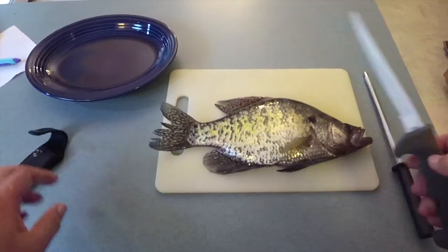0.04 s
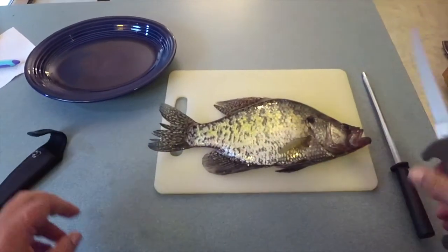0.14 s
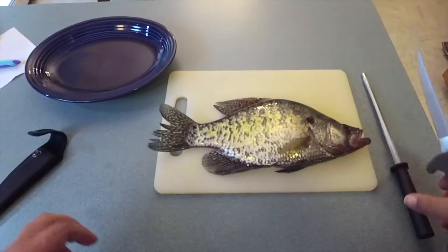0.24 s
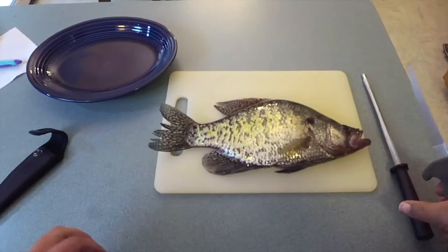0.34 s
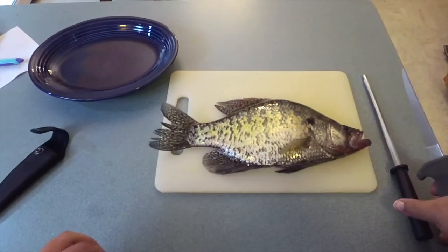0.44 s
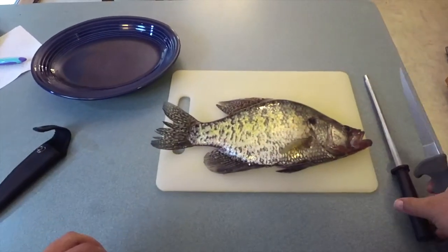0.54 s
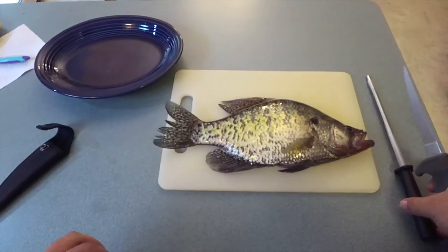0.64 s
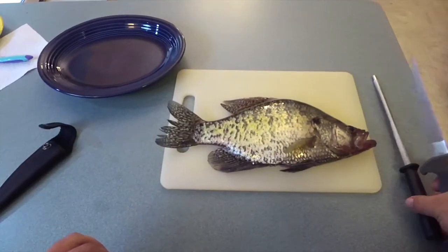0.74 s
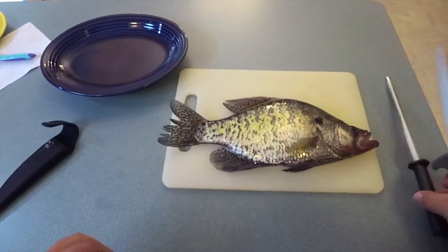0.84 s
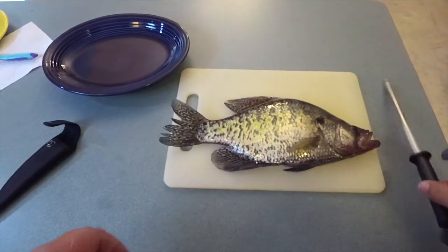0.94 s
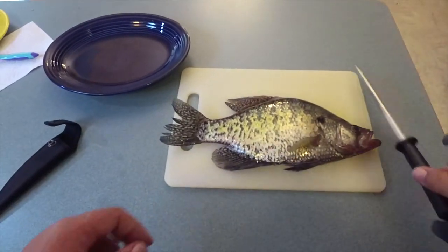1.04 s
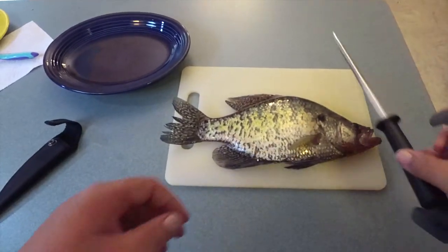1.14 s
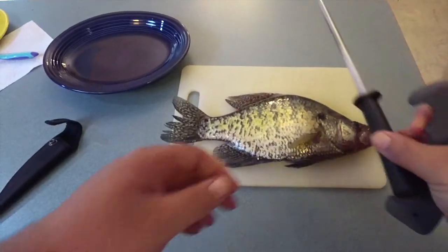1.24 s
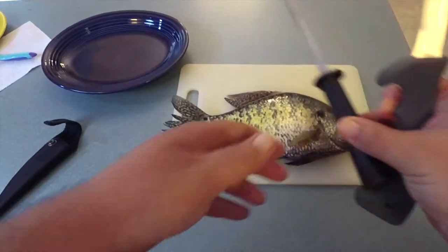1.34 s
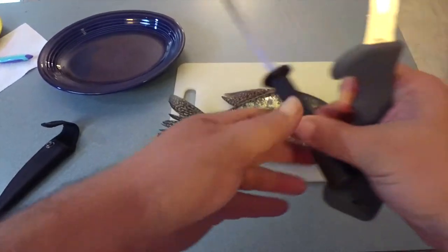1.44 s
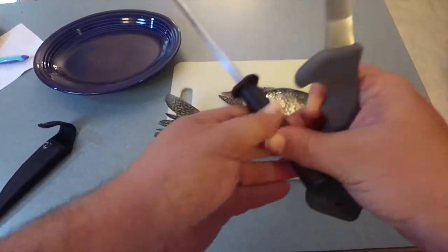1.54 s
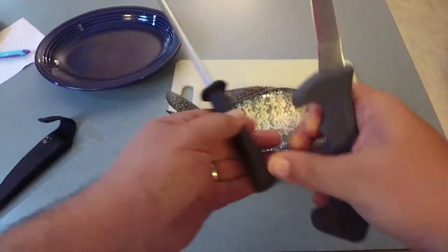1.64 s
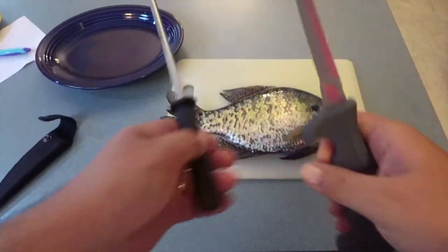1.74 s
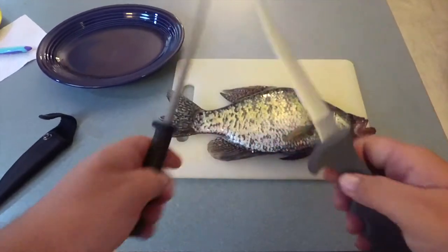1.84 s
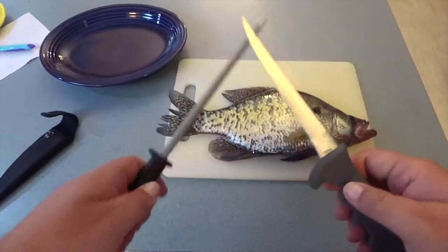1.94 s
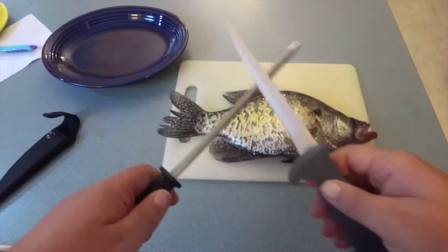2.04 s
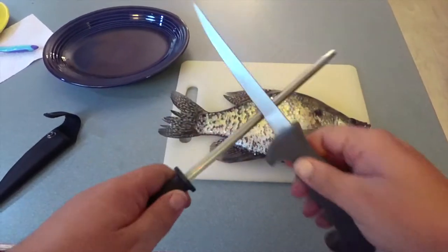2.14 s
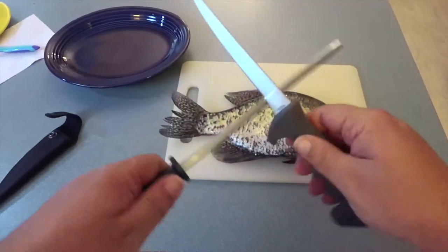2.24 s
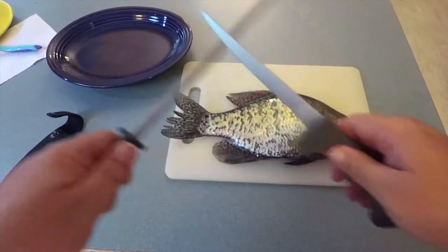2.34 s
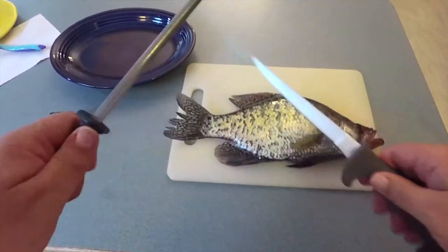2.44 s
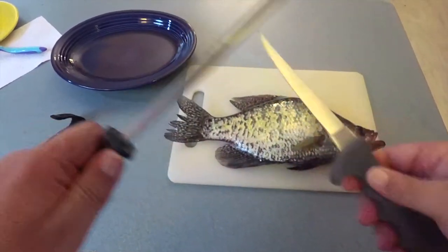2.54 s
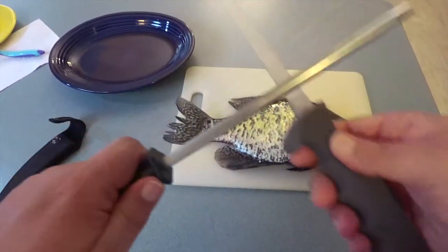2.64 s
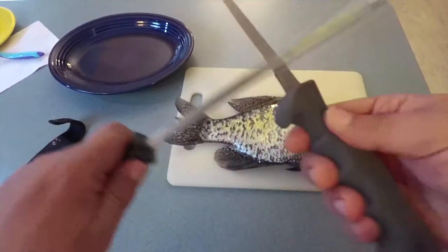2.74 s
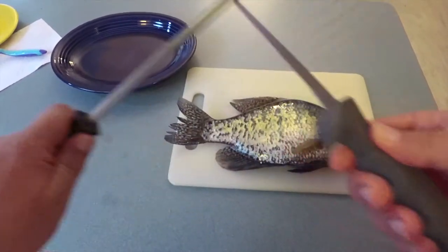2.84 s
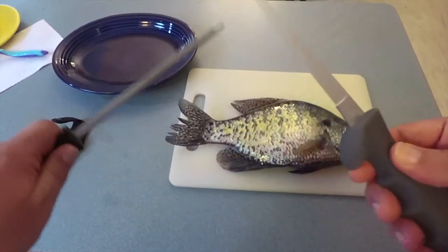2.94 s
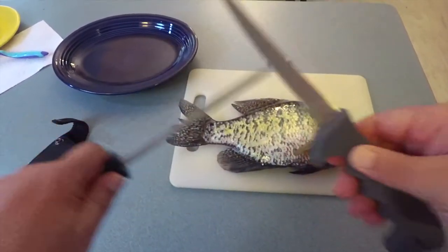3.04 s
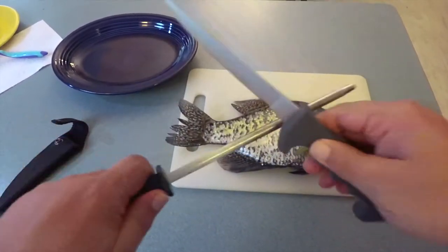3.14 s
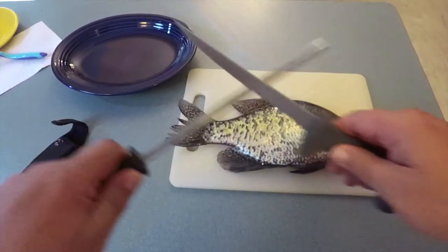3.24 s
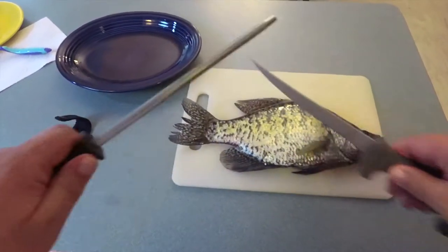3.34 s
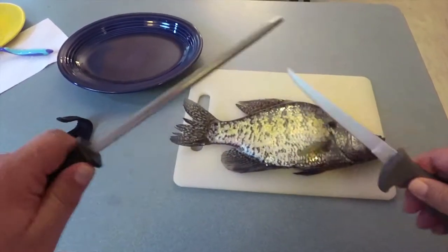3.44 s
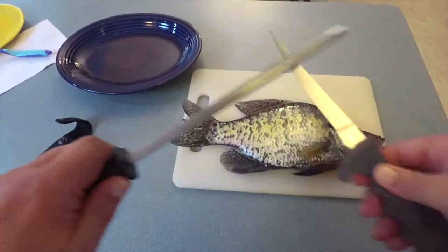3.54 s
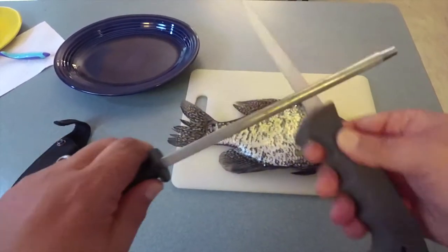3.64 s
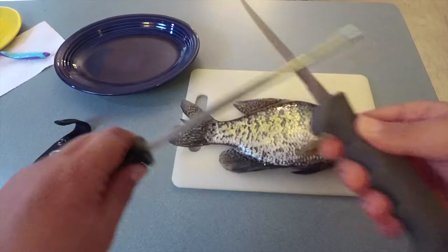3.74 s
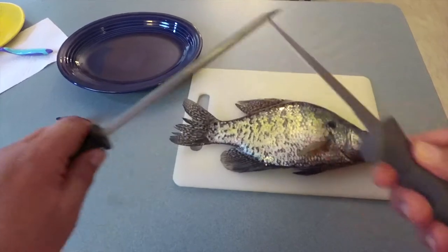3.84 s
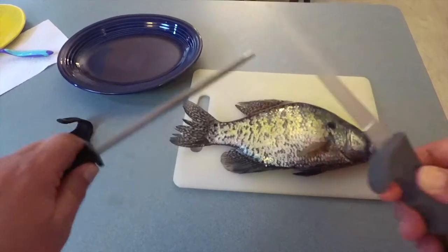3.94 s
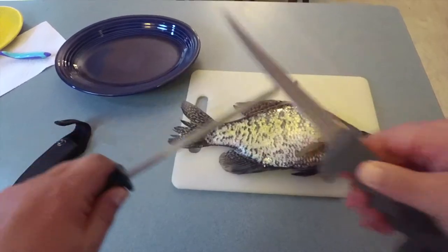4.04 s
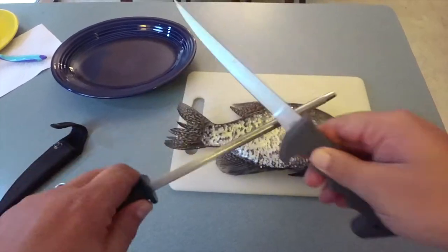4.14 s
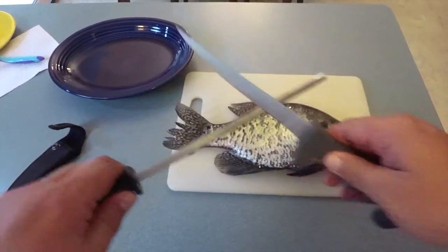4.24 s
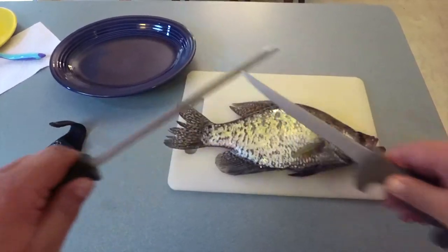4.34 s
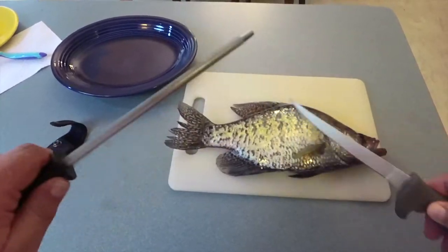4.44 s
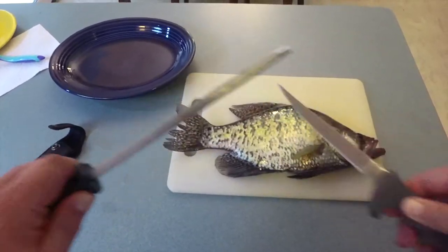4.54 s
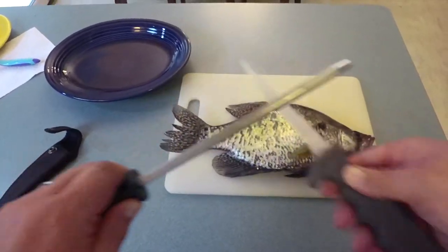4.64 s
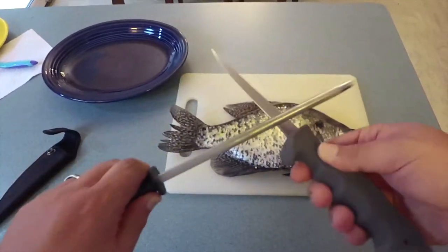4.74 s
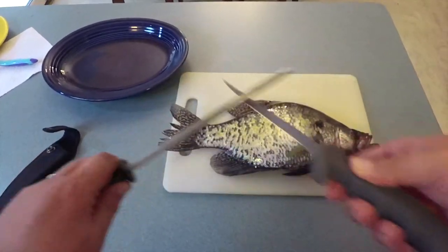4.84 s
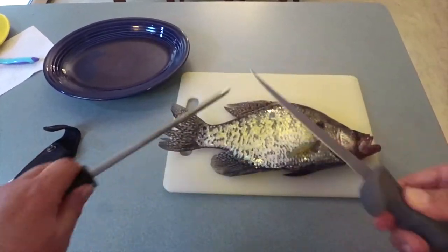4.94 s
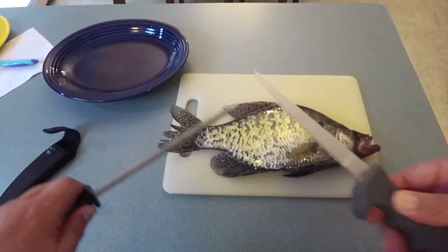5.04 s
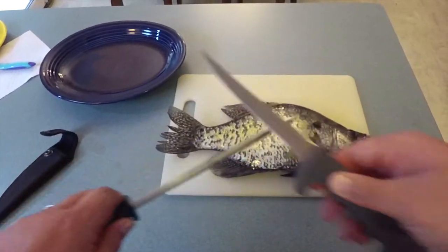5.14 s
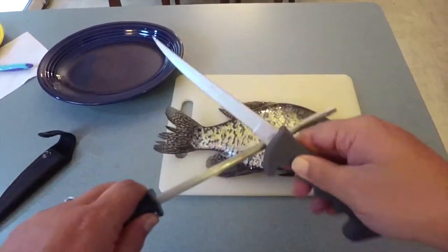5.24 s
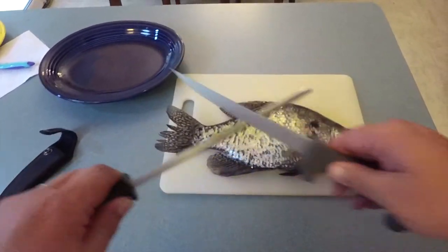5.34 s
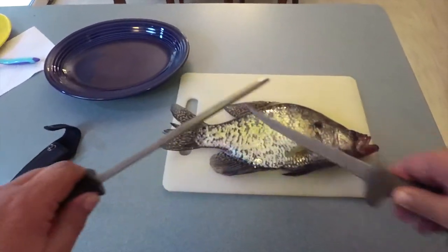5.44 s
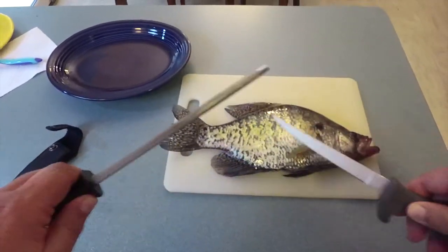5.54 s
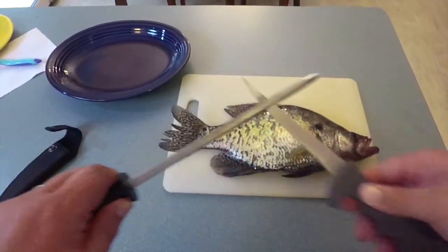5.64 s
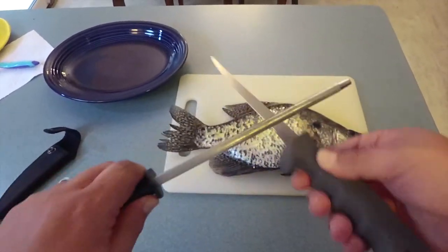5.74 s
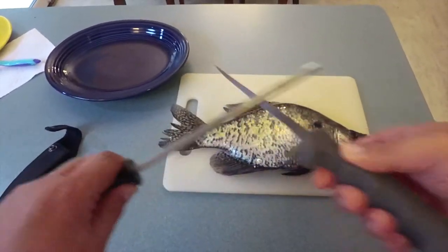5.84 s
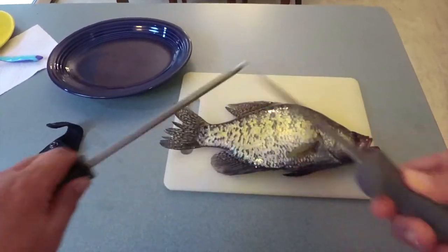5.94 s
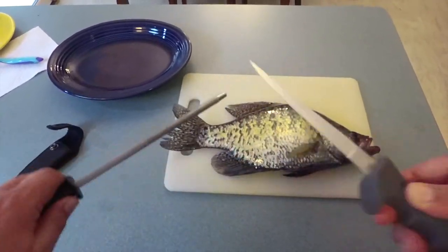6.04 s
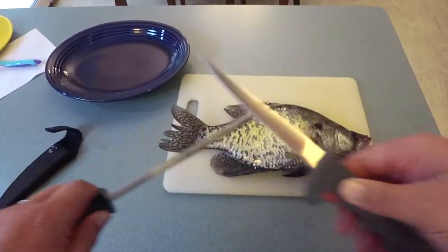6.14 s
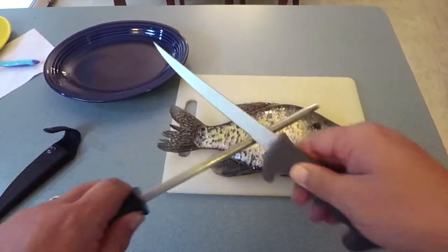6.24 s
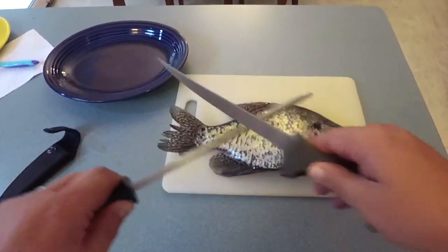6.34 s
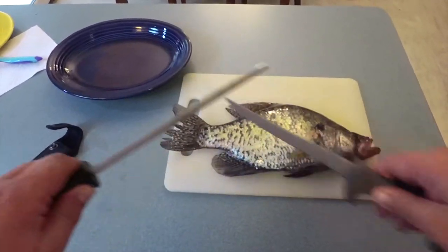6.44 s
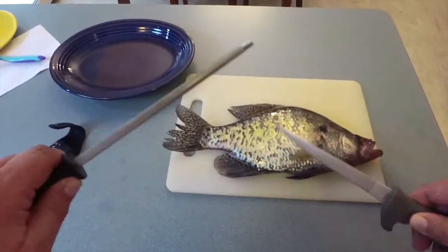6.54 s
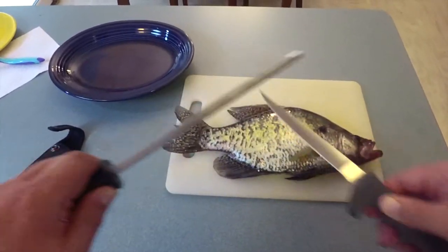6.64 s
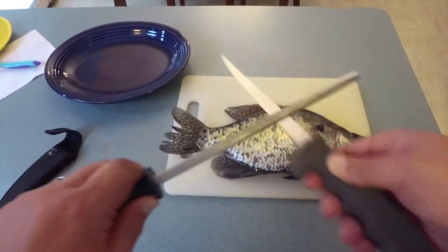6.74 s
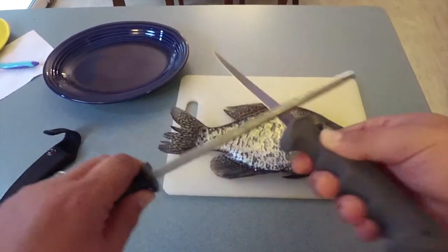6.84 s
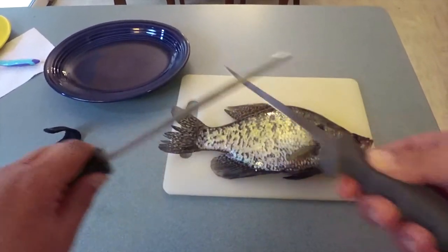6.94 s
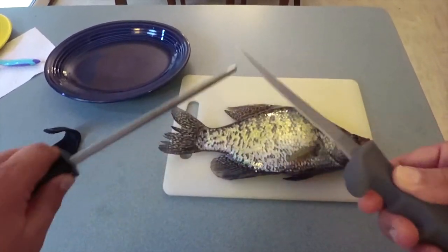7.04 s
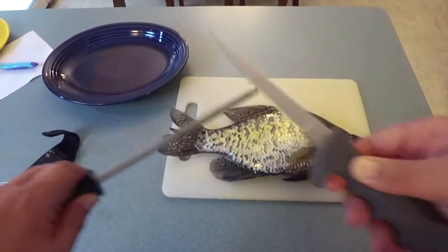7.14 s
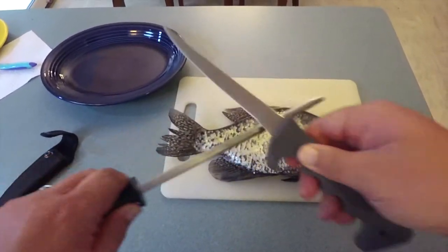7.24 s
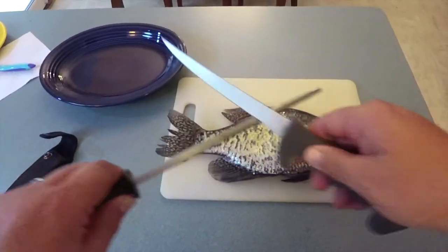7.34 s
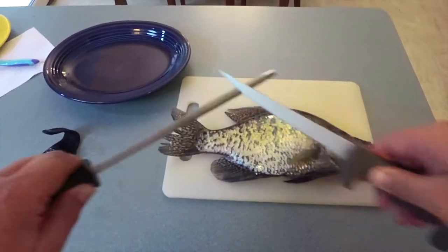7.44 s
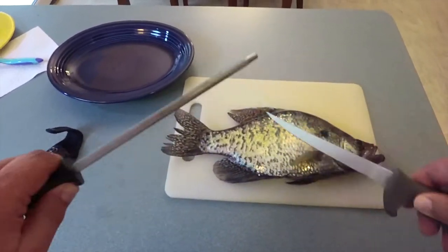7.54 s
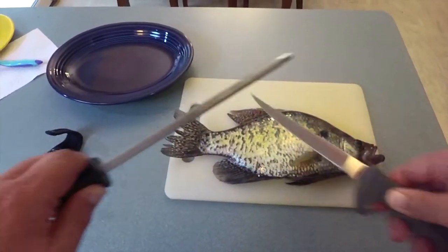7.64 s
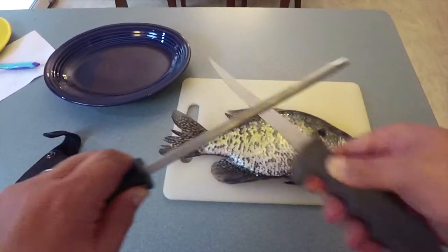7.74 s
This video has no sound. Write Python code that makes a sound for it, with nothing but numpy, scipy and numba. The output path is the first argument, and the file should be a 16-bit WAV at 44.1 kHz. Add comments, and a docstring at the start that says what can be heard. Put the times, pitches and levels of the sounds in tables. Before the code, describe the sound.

Close over a kitchen table, soft room rumble and faint hiss. A steel rod is picked up with a brief dull knocking, juddering drag. After a pause, a thin knife takes eleven short rasping strokes on it, about two a second, each grainy and bright with a metallic ring sliding upward. Small sharp clacks mark many strokes.

```python
"""A kitchen with the microphone close over the table: a soft rumble and faint hiss run throughout.
First a steel rod bumps and drags on the table as it is picked up, a juddering noise through dull table rings.
Then a thin fillet knife takes eleven strokes on the rod, on alternate faces of the blade.
Each is a dense rasp of tiny impacts, with a blade ring that creeps up and leaps as the contact nears the tip;
hard clacks are short damped rings with a crack. The small room answers with a decaying noise echo."""
import sys
import numpy as np
from scipy import signal
from scipy.fft import rfft, irfft, next_fast_len
from scipy.io import wavfile
from scipy.ndimage import map_coordinates
from numba import njit

SR = 44100
rng = np.random.default_rng(int(sys.argv[2]) if len(sys.argv) > 2 else 0)


def store_wav(level_fs):
    """Save 16-bit WAV to argv[1]."""
    pcm = np.round(np.clip(np.atleast_2d(level_fs), -1, 1) * 32767)
    wavfile.write(sys.argv[1], SR, pcm.T.astype(np.int16))


N = 343256

# Blade and rod heard together, one face up. Each row: frequency in Hz, relative density in dB per Hz.
FACE_OVER_SPECTRUM = [(880, -24.5), (1500, -25), (1630, -51), (1810, -15.5), (1990, 2.5), (2440, -48),
                      (2650, -11.5), (2900, 2.5), (3860, 2.5), (4380, 0.5), (5170, 2), (6090, -2.5),
                      (7240, -8.5), (8100, -6), (9000, -29), (11700, -70.5), (19800, -120)]
# The same with the other face on the rod. Each row: frequency in Hz, relative density in dB per Hz.
FACE_UNDER_SPECTRUM = [(880, -30.5), (1500, -46.5), (1740, -23), (1890, -7), (2150, 3.5), (2670, -2),
                       (3030, 4), (3550, -4), (3920, -0.5), (4420, -1.5), (5250, -1), (6050, -7),
                       (7030, -10), (8040, -11.5), (9000, -19), (11700, -60), (19800, -120)]
# Low body of the scrape. Each row: frequency in Hz, relative density in dB per Hz.
BODY_SPECTRUM = [(60, -74), (170, -34), (350, -9.5), (700, -15), (950, 2.5), (1200, 2), (1550, 0),
                 (2000, -1), (3000, -64)]
# Fizz of the edge. Each row: frequency in Hz, relative density in dB per Hz.
FIZZ_SPECTRUM = [(3000, -77), (6000, -35), (8000, 10), (9400, 0), (11000, 7), (12500, 2.5), (13700, -7.5),
                 (15000, -24), (16000, -35)]
# Narrow rings of the steel. Each row: frequency in Hz, width in Hz, relative level in dB.
STEEL_MODES = [(2124, 125, 6.5), (2280, 230, 8.5), (2502, 26, -12), (2880, 48, -10), (3230, 68, 6),
               (3260, 14, 11), (3860, 150, -4), (4850, 210, 7.5), (4990, 17, 1), (5960, 91, 5.5),
               (7200, 210, -3)]


def strokes():
    """The edge rasps along the rod; pressure sets the level and the contact point tunes the blade."""
    faces, body_level, fizz_level, bending, glide_hz = gesture()
    impacts = asperities(per_second=5000, scatter_db=4.5, chatter_db=-0.24, chatter_rate=300)
    grit = shifting(impacts, depth_db=6.0)

    rasp_over = faces[0] * unit(coloured(grit, FACE_OVER_SPECTRUM))
    rasp_under = faces[1] * unit(coloured(grit, FACE_UNDER_SPECTRUM))
    rasp = rasp_over + rasp_under
    steel = ringing(grit * faces.sum(0), STEEL_MODES) / np.std(ringing(grit, STEEL_MODES))
    body = body_level * unit(coloured(grit, BODY_SPECTRUM))

    # two bending resonances glide together
    blade = blade_mode(bending, glide_hz, damping=0.13)
    blade = blade + amp(-8.5) * blade_mode(bending, 1.79 * glide_hz, damping=0.044)
    # the narrow blade radiates little bass: (Hz, gain dB)
    blade = coloured(blade, [(80, -63), (500, -29), (1300, -42.5), (1900, -1), (6300, 0.5),
                             (8000, -30.0), (12000, -24)])

    # the finest burrs of the edge hiss more densely than they rasp
    burrs = asperities(per_second=12000, scatter_db=3.0, chatter_db=2.0, chatter_rate=300)
    burrs = shifting(burrs, depth_db=4.0, life=0.029)
    hiss = amp(-1.5) * fizz_level * unit(coloured(burrs, FIZZ_SPECTRUM))

    mix = amp(-2.5) * rasp + amp(-15.0) * steel + amp(-1.0) * blade + amp(-2.5) * body + hiss
    return low_cut(mix, hz=140)


# The strokes, on alternate faces. Each row: start in seconds, length in seconds, time to bite in seconds,
# rasp level in dB before the mix, swell from heel to tip in dB, then low body, edge fizz and blade ring
# in dB against the rasp before the mix, ring at the heel in Hz, ring near the tip in Hz,
# share of the stroke at which the ring leaps there.
STROKES_ON_ROD = [(2.248, 0.19, 0.02, -34.5, 6, -7, -2, 3.5, 1700, 5760, 0.45),
                  (2.739, 0.19, 0.023, -30, 5, 3, -2, 3, 1740, 4000, 0.83),
                  (3.260, 0.14, .016, -33, 0.5, 3, 3, -1, 2370, 5440, 0.48),
                  (3.748, 0.17, 0.015, -27.5, 1.5, 3, -1.5, -7, 2120, 4140, .85),
                  (4.263, 0.16, 0.019, -36.5, -2.5, 3, 2.5, 3.5, 2480, 5800, 0.58),
                  (4.812, 0.15, 0.015, -30.5, 2.5, -0.5, 3, 3, 2350, 5750, .66),
                  (5.353, 0.16, 0.02, -34, -10, 1, 2, -3, 2380, 5170, .62),
                  (5.824, .170, 0.016, -30.7, 8.5, -1, -2.5, 0.5, 2140, 4700, 0.79),
                  (6.346, 0.18, 0.023, -37, -5.5, 3.5, 2.5, 4.5, 2100, 5140, 0.64),
                  (6.860, 0.2, 0.012, -31.5, 4, -2, 0, 1, 2080, 5940, 0.69),
                  (7.380, 0.18, 0.027, -33, -8.5, 3, 2.5, 0, 1890, 4200, 0.71)]
# What each stroke on one face goes through from heel to tip. Each row: share of the stroke,
# rasp change in dB, then low body, edge fizz and blade ring in dB against the rasp, added to the stroke's own.
COURSE_OVER_FACE = [(0, 3, -9.5, -10.5, -17), (.15, -0.5, -13.5, -15.5, -7.5), (.42, -1.5, -19.5, -20, -4),
                    (.6, -1.5, -30.5, -15.5, -1), (.75, 2.5, -20.5, -18.5, -1.5), (1, -1, -36, -6, -12.5)]
# The same on the other face. Each row: share of the stroke, rasp change in dB,
# then low body, edge fizz and blade ring in dB against the rasp.
COURSE_UNDER_FACE = [(0, -0.69, -20.5, -8, -19.5), (.25, 0.94, -18, -22, -2), (.45, -1.5, -26.5, -22, -1),
                     (.62, -1, -30, -11, -1.5), (.82, 1, -19, -11.5, -4.5), (1, -2, -32.5, -7.5, -8)]
LEAVE_S = 0.0056  # decay time of the rasp in seconds once the edge has left the rod
CREEP_OCTAVES, LEAP_SHARE = 1.103, 0.066  # steady climb before the leap takes over; leap width as share of stroke


def gesture():
    """The edge bites, slides and leaves, while the blade's ring creeps up and then leaps."""
    t = np.arange(N) / SR
    faces, (body, fizz, bending) = np.zeros((2, N)), np.zeros((3, N))
    ring_hz = np.full(N, SR / 10)  # idle value where no stroke sounds
    for k, row in enumerate(STROKES_ON_ROD):
        start, length, bite, rasp_db, swell_db, body_db, fizz_db, ring_db, heel_hz, tip_hz, leap = row
        span = slice(round(start * SR), round((start + length) * SR) + SR // 10)
        age = t[span] - start
        progress = np.clip(age / length, 0, 1)
        share, *columns = np.transpose((COURSE_OVER_FACE, COURSE_UNDER_FACE)[k % 2])
        push, thud, hiss, ring = [np.interp(progress, share, c) for c in columns]

        touch = np.clip(age / bite, 0, 1) ** 2 * np.exp(-np.maximum(age - length, 0) / LEAVE_S)
        pressure = touch * amp(rasp_db + swell_db * (progress - .5) + push)
        faces[k % 2, span] += pressure
        body[span] += pressure * amp(body_db + thud)
        fizz[span] += pressure * amp(fizz_db + hiss)
        bending[span] += pressure * amp(ring_db + ring)

        leapt = .5 + .5 * np.tanh((progress - leap) / LEAP_SHARE)
        creeping_hz = heel_hz * 2 ** (CREEP_OCTAVES * progress)
        ring_hz[span] = creeping_hz ** (1 - leapt) * tip_hz ** leapt
    held = grip()
    return faces * held, body * held, fizz * held, bending * held, ring_hz


def blade_mode(drive, hz, damping):
    """Slips excite one bending resonance; damping is its width over its frequency."""
    slips = asperities(per_second=3400, scatter_db=6.5, chatter_db=3, chatter_rate=160)
    hz = hz * (1 + 0.06 * wobble(110))
    return moving_mode(slips * drive, 2 * np.pi * hz / SR, np.exp(-np.pi * damping * hz / SR))


@njit
def moving_mode(x, angle, radius):
    """A resonance whose frequency and damping change at every sample; it keeps the power of white noise."""
    y, state = np.zeros(len(x)), 0j
    for i in range(len(x)):
        state = state * radius[i] * np.exp(1j * angle[i]) + x[i]
        y[i] = state.imag * np.sqrt(2 * (1 - radius[i] ** 2))
    return y


def asperities(per_second, scatter_db, chatter_db, chatter_rate):
    """Tiny impacts of uneven size, clumped by stick and slip; rms 1."""
    hits = (rng.random(N) < per_second / SR) * rng.choice([-1, 1], N)
    scatter = scatter_db * np.clip(rng.standard_normal(N), -2, 2)
    chatter = chatter_db * np.clip(wobble(chatter_rate), -2, 2)
    return unit(hits * amp(scatter + chatter))


def shifting(x, depth_db, width_hz=330, life=0.0093):
    """The moving contact feeds ever different resonances: short patches of the spectrum swell and fade."""
    hz, t, z = signal.stft(x, SR, nperseg=256)
    across = np.exp(-2 * ((hz[:13] - hz[6]) / width_hz) ** 2)
    through = np.exp(-2 * ((t[:17] - t[8]) / life) ** 2)
    patch = np.outer(across, through)
    field = unit(signal.fftconvolve(rng.standard_normal(z.shape), patch, "same"))
    swollen = z * amp(depth_db * np.clip(field, -2, 2))
    return unit(signal.istft(swollen, SR, nperseg=256)[1][:N])


# The blade knocks on the rod or slips off its end. Each row: start in seconds, level in dB before the mix,
# frequency in Hz, time constant of the ring in ms.
CLACK_HITS = [(2.321, -26, 1170, 0.84), (2.801, -16, 2600, 0.17), (2.887, -17.5, 5060, 0.43),
              (2.903, -14, 2080, 0.59), (3.39, -19.5, 4000, 0.67), (3.788, -15, 2150, 0.98),
              (3.908, -21.5, 1120, 1.1), (3.917, -16.5, 2246, 1.8), (4.413, -18, 3350, 0.56),
              (4.414, -16, 5110, 0.63), (4.951, -22.5, 2640, 0.32), (5.444, -25.5, 4670, 0.79),
              (5.501, -20.5, 2520, 0.53), (5.969, -16, 2290, 1.2), (6.38, -23, 1230, 0.67),
              (6.513, -22, 3660, 0.42), (6.922, -18, 2170, 0.39), (7.056, -25.5, 2250, 2.1),
              (7.407, -24.5, 1270, 0.8), (7.477, -20.5, 3580, 0.62), (7.552, -15, 3120, 1.36)]
# Colour of the crack. Each row: frequency in Hz, gain in dB.
CRACK_COLOUR = [(50, -42), (250, -3), (900, -14.5), (2000, 4.5), (5500, 18.5), (9000, -13.5), (15000, -34)]


def clacks(crack_db=-13, crack_time=0.0014):
    """Steel on steel: a damped ring and a short crack of decaying noise."""
    cracks, t = np.zeros(N), np.arange(SR // 25) / SR
    for s, db, hz, ms in CLACK_HITS:
        add(cracks, s, amp(db + crack_db) * np.exp(-t / crack_time) * rng.standard_normal(len(t)))
    return amp(-3) * damped_rings(CLACK_HITS) + coloured(cracks, CRACK_COLOUR)


def grip(skip_db=5, lead=0.00067):
    """The edge skips off the rod for a moment just before each clack."""
    lift, t = np.zeros(N), np.arange(SR // 80) / SR
    for s, *_ in CLACK_HITS:
        add(lift, s - len(t) / SR, np.exp(-((t - t[-1] + lead) / lead) ** 2))
    return amp(-skip_db * np.minimum(lift, 1))


def damped_rings(rows):
    """One short ring for each contact; the hands damp it at once."""
    rings, t = np.zeros(N), np.arange(SR // 25) / SR
    for s, db, hz, ms in rows:
        age = t / (ms / 1000)  # in time constants
        envelope = age * np.exp(1 - age)
        add(rings, s, amp(db) * envelope * np.sin(2 * np.pi * hz * t))
    return low_cut(rings, hz=250)


# The rod dragged over the table. Each row: time in seconds, level in dB before the mix.
DRAG_LEVEL = [(0.74, -59), (0.78, -46), (0.792, -53), (0.804, -34.5), (0.854, -31), (0.974, -45.5),
              (1.02, -81)]
# The rod bumps and catches on the table. Each row: start in seconds, level in dB before the mix,
# frequency in Hz, time constant of the ring in ms.
TABLE_BUMPS = [(.659, -44, 584, 0.69), (.662, -49, 1126, 2), (.773, -34, 1210, 1.3),
               (.803, -29.5, 1150, 3.2), (.843, -25.5, 1130, 1.9), (.843, -47, 3260, 1.9),
               (.851, -31.5, 708, 4.9), (.860, -22.5, 1300, 1), (.892, -29.5, 1090, 3.9),
               (.897, -36.5, 2330, 1.9), (.937, -29, 1300, 1.5)]
# Resonances of the table top. Each row: frequency in Hz, width in Hz, relative level in dB.
TABLE_MODES = [(710, 57, -4), (1097, 38, -1), (1280, 44, 0), (1916, 110, -30), (2150, 27, -12),
               (2440, 15, -23)]
# Broad colour of the table top. Each row: frequency in Hz, relative gain in dB.
TABLE_SPECTRUM = [(76, -78), (130, -41), (241, -16), (387, -24.5), (496, -9.5), (629, -9.5), (707, -10),
                  (970, -10.5), (1080, 5.5), (1350, 0), (1770, -10), (2280, -28), (3000, -38), (3900, -60),
                  (6600, -120)]


def table_top(x):
    """The table answers with a broad colour and dull rings."""
    broad = coloured(x, TABLE_SPECTRUM) * amp(2)
    rings = ringing(ringing(x, TABLE_MODES), [(1003, 1200, 0.0047)])
    return broad + rings


def pickup():
    """The rod judders and bumps over the table top, which rings dully."""
    drag_db, = curves(DRAG_LEVEL)
    t = np.arange(N) / SR
    sliding = (t > DRAG_LEVEL[0][0]) & (t < DRAG_LEVEL[-1][0])
    judder = asperities(per_second=1600, scatter_db=-2.5, chatter_db=2.0, chatter_rate=130)
    drag = table_top(sliding * amp(drag_db - 5.0) * judder / np.std(table_top(judder)))
    return drag + amp(-2.5) * damped_rings(TABLE_BUMPS)


# Decay of the small room. Each row: frequency in Hz, time to fall by 60 dB in seconds.
KITCHEN_DECAY = [(200, 0.31), (1000, 0.16), (2200, 0.15), (3500, 0.26), (5500, 0.26), (7000, 0.22),
                 (9000, 0.18), (14000, 0.18)]


def kitchen(x, gap=.004):
    """Table and walls answer with a noise echo, drawn afresh each quarter second; each frequency has its decay."""
    echo, size = np.zeros(N), SR // 4
    for first in range(0, N, size):
        hz, t, z = signal.stft(rng.standard_normal(SR // 3), SR, nperseg=256)
        decay = amp(-60 * t / along(KITCHEN_DECAY, hz)[:, None])
        tail = signal.istft(z * decay, SR, nperseg=256)[1]
        add(echo, first / SR + gap, signal.fftconvolve(x[first:first + size], tail / np.linalg.norm(tail)))
    return echo


# Background noise, whose level rises and falls. Each row: time in seconds, level in dB before a small trim.
BACKGROUND_LEVEL = [(0.0, -66), (0.65, -70), (0.87, -61.5), (1.78, -67.5), (3.55, -59.5), (4.33, -62.5),
                    (5.76, -60.5), (7.78, -62.5)]
# Colour of the background noise. Each row: frequency in Hz, relative density in dB per Hz.
BACKGROUND_SPECTRUM = [(15, -59), (25, -49), (43, -45), (73, -25), (221, -1.5), (460, -6), (741, -4),
                       (1040, -8), (2120, -17.5), (3000, -18), (4100, -19), (5000, -28), (7000, -25.5),
                       (10000, -28.5), (15500, -38)]


def background():
    """A soft rumble with faint hiss: coloured noise whose level follows a set curve up and down."""
    level_db, = curves(BACKGROUND_LEVEL)
    return amp(level_db + 0.5) * unit(coloured(rng.standard_normal(N), BACKGROUND_SPECTRUM))


def amp(db):
    """Decibels to gain."""
    return 10 ** (np.asarray(db) / 20)


def unit(x):
    """Scaled to rms 1."""
    return x / np.sqrt(np.mean(x ** 2) + 1e-20)


def along(points, hz):
    """(Hz, value) points read on a log axis."""
    f, v = np.transpose(points)
    return np.interp(np.log(hz + 1), np.log(f + 1), v)


def curves(rows):
    """One value per sample for each column after the time."""
    s, *cols = np.transpose(rows)
    return [np.interp(np.arange(N) / SR, s, c) for c in cols]


def wobble(rate):
    """A smooth random curve, rate knots a second."""
    knots = rng.standard_normal(int(N * rate / SR) + 4)
    return map_coordinates(knots, [np.arange(N) * rate / SR])


def filtered(x, response):
    """x times a complex response of frequency."""
    size = 2 * next_fast_len(N // 2 + SR // 4)
    return irfft(rfft(x, size) * response(np.fft.rfftfreq(size, 1 / SR)), size)[:N]


def coloured(x, spectrum):
    """x through a causal filter with the given (Hz, dB) spectrum."""
    def response(hz):
        # folding the cepstrum forward in time gives minimum phase
        cepstrum = irfft(np.log(amp(along(spectrum, hz)) + 1e-6))
        half = len(cepstrum) // 2
        cepstrum[1:half] *= 2
        cepstrum[half + 1:] = 0
        return np.exp(rfft(cepstrum))
    return filtered(x, response)


def low_cut(x, hz):
    """Small objects radiate no deep bass."""
    return signal.sosfilt(signal.butter(2, hz, "high", fs=SR, output="sos"), x)


def ringing(x, modes):
    """x through (Hz, width Hz, dB) resonances of alternating sign."""
    def response(f):
        total = 0
        for k, (centre, width, db) in enumerate(modes):
            damped = 1j * f * width
            total = total + (-1) ** k * amp(db) * damped / (centre * centre - f * f + damped)
        return total
    return filtered(x, response)


def add(track, s, sound):
    """Mix a sound into the track at time s."""
    part = track[round(s * SR):][:len(sound)]
    part += sound[:len(part)]


def scene():
    """Steel and table close by, with the room around them."""
    scrape, knocks, table = strokes(), clacks(), pickup()
    echo = kitchen(amp(-6.5) * scrape + amp(-11) * knocks + amp(-0.5) * table)
    return (scrape + knocks + table + echo + background())[None]


TOP_HZ = 15400


def record(dry):
    """The camera's microphone track keeps nothing from its band limit upwards."""
    return np.array([filtered(channel, lambda hz: hz < TOP_HZ) for channel in dry])


dry = scene()
out = record(dry)
store_wav(out)
```